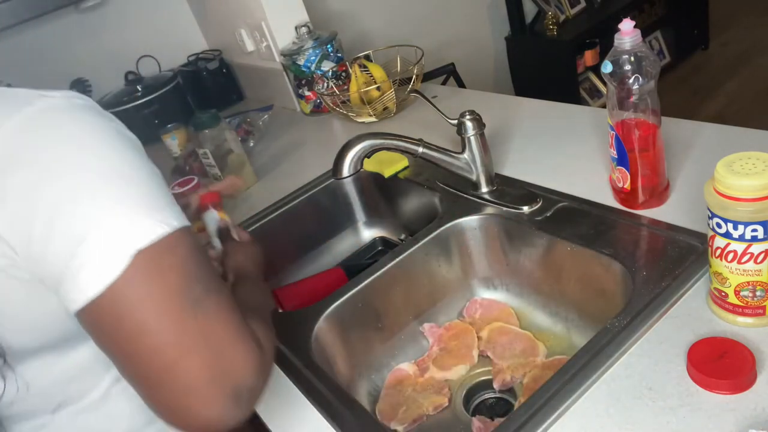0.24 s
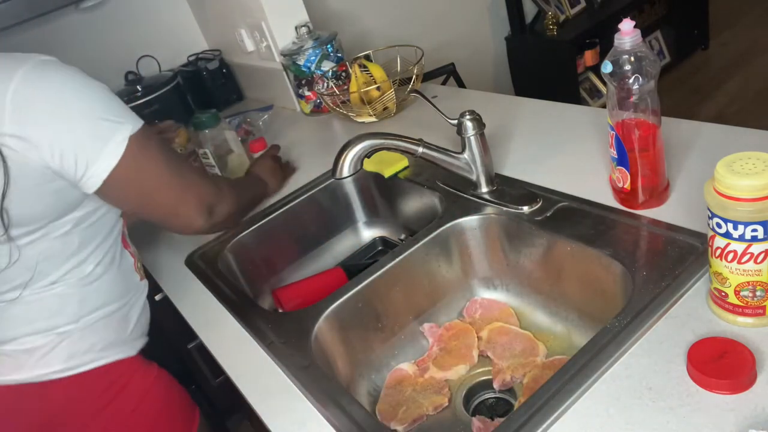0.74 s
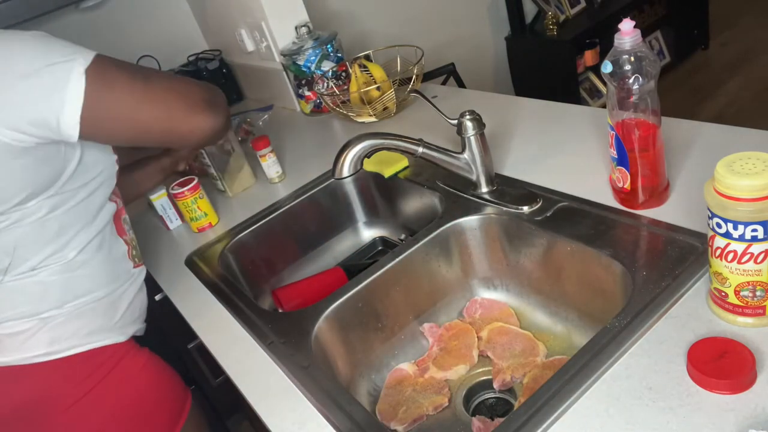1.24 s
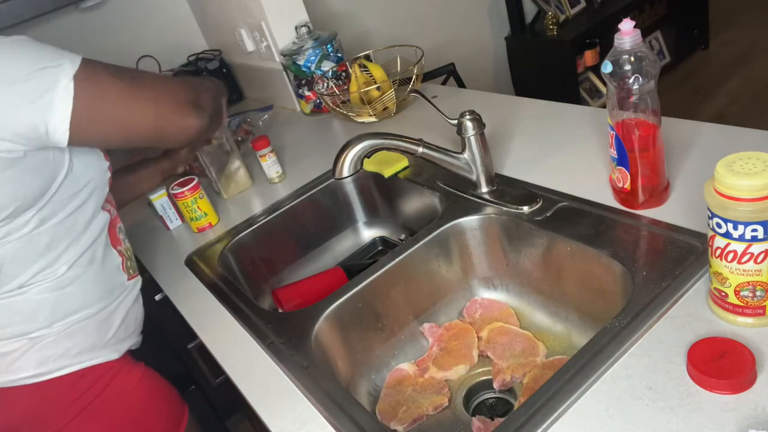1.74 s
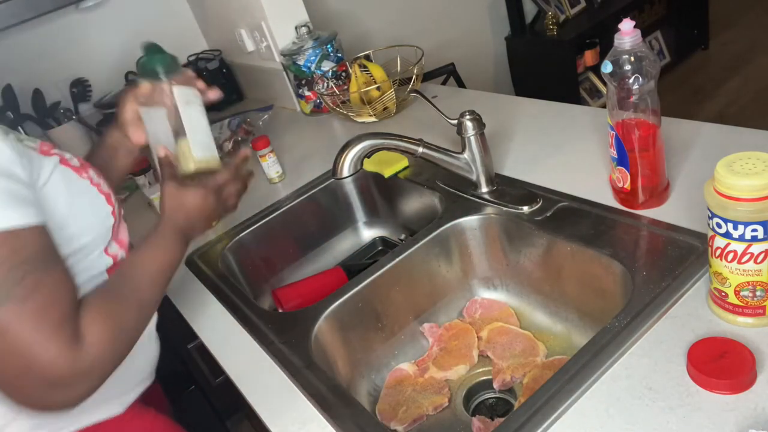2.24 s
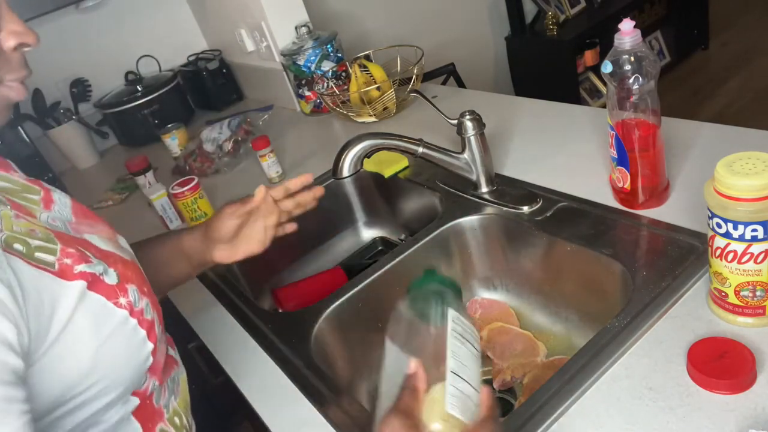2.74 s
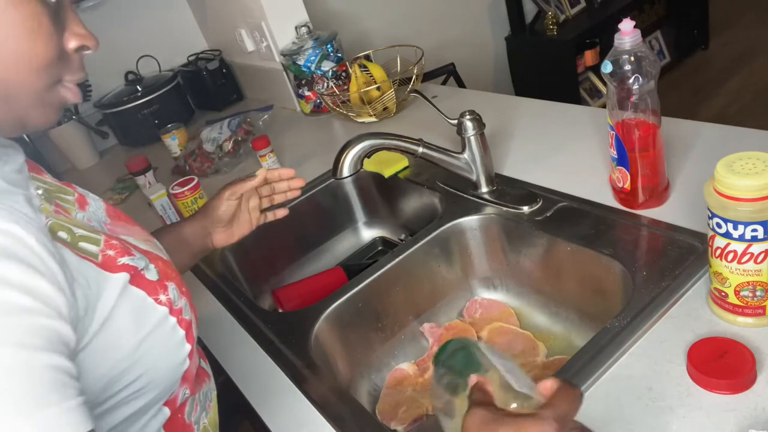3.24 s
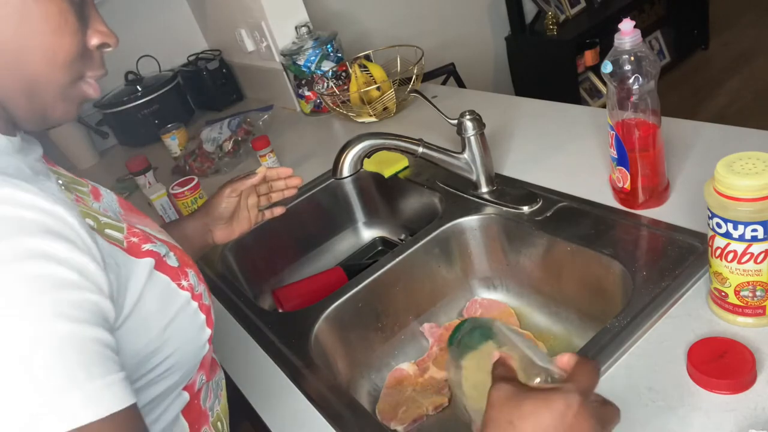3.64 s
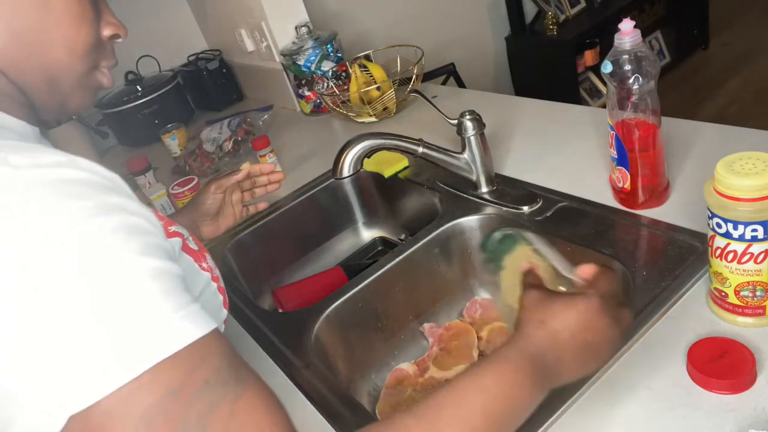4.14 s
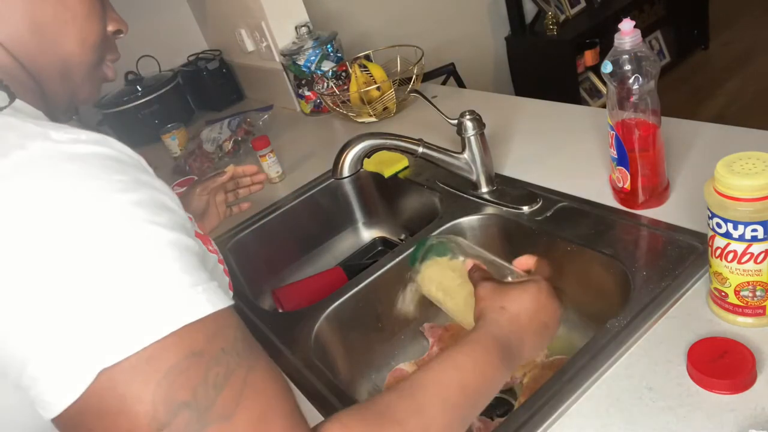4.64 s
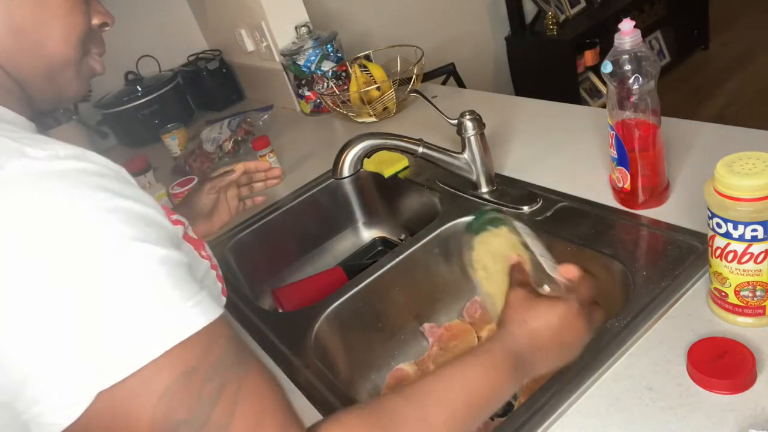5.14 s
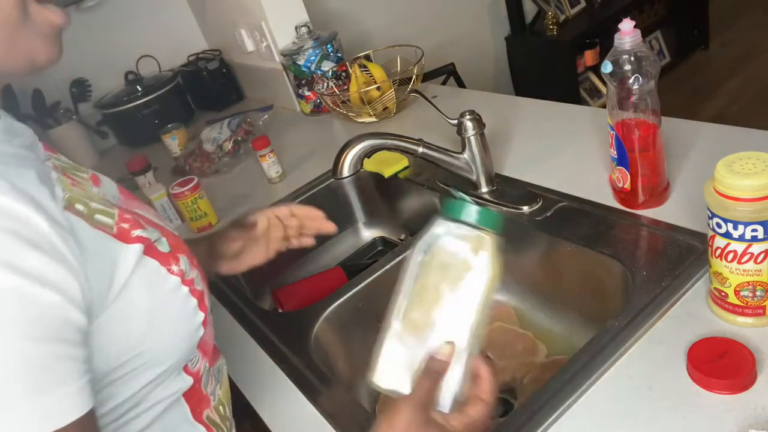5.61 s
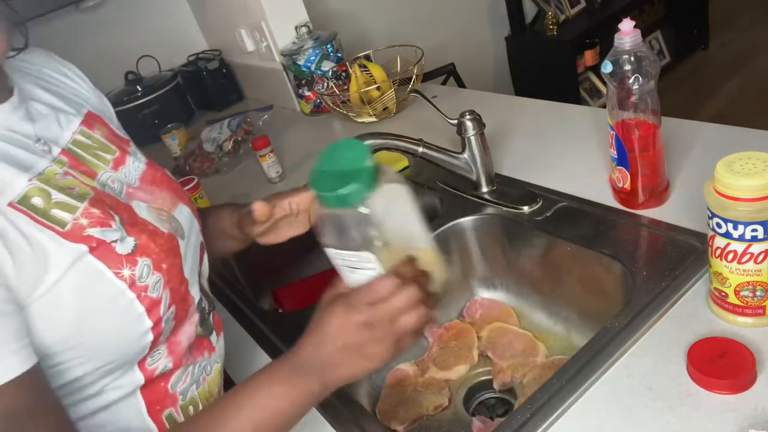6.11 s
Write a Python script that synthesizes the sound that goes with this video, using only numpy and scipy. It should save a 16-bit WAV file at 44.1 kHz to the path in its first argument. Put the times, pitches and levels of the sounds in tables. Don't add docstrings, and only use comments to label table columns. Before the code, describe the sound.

Hollow jar knocks and a sharp counter bang, then quick dry granule shakes, a ringing lid snap and a final thump in a hard kitchen.

```python
import sys
import numpy as np
from scipy import signal
from scipy.fft import rfft, irfft, next_fast_len
from scipy.io import wavfile
from scipy.ndimage import uniform_filter1d

SR = 44100
rng = np.random.default_rng(int(sys.argv[2]) if len(sys.argv) > 2 else 0)


def file_out(sig):
    cols = np.atleast_2d(sig).T
    lim = np.clip(cols, -1, 1)
    pcm = np.round(lim * 32767).astype(np.int16)
    wavfile.write(sys.argv[1], SR, pcm)


def ratio(d):
    e = np.asarray(d, float) / 20
    return 10 ** e


N = 280917
LEAD = 8192


def at_hz(points, hz, column=1):
    points = np.array(points)
    return np.interp(np.log(hz), np.log(points[:, 0]), points[:, column])


def drift(rate):
    r = np.exp(-80 * np.pi * rate / SR)
    noise = rng.standard_normal(N // 40 + 4002)
    slow = signal.lfilter([1], [1, -2 * r, r * r], noise)[4000:]
    slow = slow - slow.mean()
    slow = slow / np.sqrt(np.mean(slow ** 2) + 1e-30)
    return np.interp(np.arange(N) / 40, np.arange(len(slow)), slow)


# (pitch_hz, likeness)
SIDE_LIKENESS = [(60, 0.9), (130, 0.8), (290, -0.1), (640, -0.3), (1400, -0.2), (3100, 0.0064),
                 (6000, -0.027), (12500, 0.1)]
# (pitch_hz, left_over_right_db)
LEFT_LEAN = [(60, 9), (240, 5.5), (950, 2), (3770, 3), (15000, -2)]


def coloured(pair, spectrum):
    length = pair.shape[1]
    size = next_fast_len(length)
    hz = np.maximum(np.arange(size // 2 + 1) * SR / size, 1)
    alike = np.clip(at_hz(SIDE_LIKENESS, hz), -.98, .98)
    lean = ratio(at_hz(LEFT_LEAN, hz) / 2)
    shares = np.sqrt([1 + alike, 1 - alike])
    mid, side = rfft(pair, size) * ratio(at_hz(spectrum, hz)) * shares
    out = irfft([(mid + side) * lean, (mid - side) / lean], size)[:, :length]
    return out / np.std(out.mean(0))


def struck(spectrum, size=4096):
    hz = np.maximum(np.arange(size // 2 + 1) * SR / size, 1)
    cepstrum = irfft(np.log(ratio(at_hz(spectrum, hz))))
    cepstrum[1:size // 2] *= 2
    answer = irfft(np.exp(rfft(cepstrum[:size // 2], size)))
    return answer / np.abs(answer).max()


BLOW_TIMES = [-0.06, 0.0657, 0.6385, 1.035, 1.2085, 1.4045, 1.5257, 5.5423, 6.362]
# (level_db, left_over_right_db, bounce_db, lead_in_db, room_send_db)
BLOWS = [
    (-10.5, 10.5, 9, -24, -15.5),
    (-11.5, 20, -24, -35.5, -15.5),
    (-19, 4, -12, -38, -13),
    (-53.5, -2, -14, -28, -12),
    (-47, 6, -5, -37, -19.5),
    (-19, 1.5, -8, -33, -14.5),
    (-3.5, 9.5, -7, -31.5, -13),
    (-4, 5.5, -13, -36, -17),
    (-13, 6.5, 1.5, -39, -6),
]
# (extra_level_db, push, + or - for direction)
BLOW_CLICKS = [(0, 1), (-3, 0.91), (2, 0.93), (0, 1), (0, 1), (3.5, 0.95), (-5.5, -1), (5, 1), (-0.5, 1)]
# (pitch_hz, level_db per Hz)
SMALL_JAR_COLOURS = [
    [(120, -36.5), (200, -18), (390, -5), (721, -12.5), (896, -4.5), (1660, -8), (2850, -17), (4640, -15),
     (9550, -21), (12500, -28), (15000, -88)],
    [(120, -40), (200, -19), (282, -12), (789, -8), (2380, -8), (3230, -12.5), (4550, -4), (5760, -13),
     (10800, -6.5), (13200, -12), (15000, -44.5)],
    [(88, -42), (150, -14.5), (371, -12), (486, -13.5), (649, -10.5), (1250, -18), (1350, -14),
     (1640, -18.5), (3890, -26.5), (4250, -33), (4750, -25), (5400, -30), (11700, -33), (14000, -38),
     (15500, -70)],
]
# (pitch_hz, level_db per Hz)
NUDGE_COLOURS = [
    [(240, -24.5), (400, 6), (1130, -13), (1360, -1), (1660, -31.5), (2270, -22.5), (12000, -43.5),
     (15600, -73), (22000, -120)],
    [(350, -44.5), (600, -15), (1000, -2), (2200, -14), (2830, -25.5), (3460, -50), (6000, -29),
     (7800, -71.5), (13200, -120)],
    [(240, -38.5), (400, -11.5), (907, -7), (994, -9.5), (1800, -10), (2600, -8), (4300, -19), (6500, -14),
     (9810, -15.5), (12900, -17), (16000, -40)],
]
# (pitch_hz, level_db per Hz)
HARD_COLOURS = [
    [(180, -30), (300, -9), (326, -20.5), (462, -11), (1060, -8.5), (1460, -3), (9090, -11), (12500, -18),
     (16000, -86)],
    [(250, -31), (900, -22), (1200, -5), (1550, -9), (1900, -12), (2200, -5), (2430, 0), (2750, -10.5),
     (3400, -20.5), (4700, -21), (5200, -14), (5700, -29), (6400, -23), (8000, -29.5), (9000, -41.5),
     (15000, -49)],
    [(180, -43.5), (300, -12), (678, -3), (2170, -19), (2740, -25), (9390, -9.5), (12700, -16.5),
     (14500, -24.5), (16000, -72)],
]


def knocks():
    common_click_db, click_top_hz = -11, 14300
    first_echo_db = -15
    before = 900
    direct, send = np.zeros((2, N + LEAD + SR)), np.zeros(N + LEAD + SR)
    t = np.arange(-before, 600) / SR
    soften = signal.butter(4, click_top_hz, fs=SR, output="sos")
    colours = SMALL_JAR_COLOURS + NUDGE_COLOURS + HARD_COLOURS
    for start_s, row, (click_db, push), colour in zip(BLOW_TIMES, BLOWS, BLOW_CLICKS, colours):
        level_db, pan_db, bounce_db, lead_in_db, send_db = row
        body = struck(colour) * ratio(level_db)
        start = LEAD + round(start_s * SR)
        send[start:][:len(body)] += body * ratio(send_db)
        body[:2] += ratio(level_db + common_click_db + click_db) * np.array([1, -.75])
        body = signal.sosfilt(soften, body)
        lead_in = signal.lfilter([1], [1, -.55], rng.standard_normal(len(t)))
        contact = lead_in * ratio(lead_in_db - 20 * np.abs(t) / 0.01)
        contact[[before, before + 30, before + 230]] += 1, -ratio(first_echo_db), ratio(bounce_db)
        sound = push * np.convolve(contact, body)
        for side, lag in enumerate((2, 0)):
            first = start - before + lag
            direct[side, first:][:len(sound)] += sound * ratio(pan_db * (.5 - side))
    return direct[:, :N + LEAD], send[:N + LEAD]


# (start_s, level_db,
# pitch_hz, fade_60db_s)
THUD_TONES = [ (0.0660, -23.5, 776, 0.037), (0.0658, -24, 10500, .02), (0.068, -32, 9500, .02),
              (0.071, -36.5, 151, 0.16), (0.6417, -36.5, 395.5, 0.34), (0.6460, -29, 647, 0.1),
              (0.643, -36.5, 1005, 0.15), (0.65, -31.5, 131, 0.057), (0.7001, -42, 598, 0.29),
              (0.6385, -36, 2500, .03), (0.716, -38, 480, .1), (1.0355, -33, 101, 0.19),
              (1.0402, -38, 182, 0.18), (1.2621, -63, 951, 0.047), (1.3051, -60, 990, 0.072),
              (1.4039, -24.5, 901, 0.018), (1.5253, -10, 2450, 0.02), (1.5256, -25.5, 4140, 0.044),
              (1.5266, -17.5, 950, .041), (1.5312, -22, 1150, .04), (1.5258, -25, 8900, .012),
              (1.5258, -22.5, 202, 0.085), (1.532, -26, 456, 0.11), (1.5400, -32, 237, 0.27),
              (1.549, -15, 68.5, 0.062), (1.6403, -31.5, 67, 0.097), (2.4193, -42.5, 165, 0.11),
              (2.5604, -67, 1830, 0.089), (2.8021, -55.5, 1495, 0.1), (5.5421, -16.5, 1170, 0.038),
              (5.5375, -23, 2410, .03), (5.5421, -19.5, 2420, 0.036), (5.5422, -28.5, 4780, .016),
              (5.812, -33.5, 138, 0.11), (6.3621, -21, 181, 0.057), (6.3631, -27, 301, 0.12)]


def thuds():
    out, t = np.zeros((2, N + SR)), np.arange(SR // 2) / SR
    phase = np.array([[.45], [-.45]])
    for start_s, level_db, pitch_hz, fade_s in THUD_TONES:
        swell = ratio(level_db - 60 * t / fade_s) * (1 - np.exp(-t * pitch_hz * 2.7))
        out[:, round(start_s * SR):][:, :len(t)] += swell * np.sin(2 * np.pi * pitch_hz * t + phase)
    return out[:, :N] * ratio([[1.8], [-1.8]])


# (pitch_hz, level_db, fade_60db_s)
SINK_TONES = [(1176, -40, .4), (1320, -39, .45), (1550, -38, .45), (1716, -36, .35), (1973, -37, .45),
              (2180, -36.5, .45), (2240, -35.5, 0.31), (2320, -33.5, .6), (2381, -30.5, .5),
              (2425, -31, .45), (2475, -33, .45), (2540, -36, .45), (2920, -38.5, .45), (4990, -47, .35),
              (5200, -42, .4)]


def sink():
    start = round(5.5425 * SR)
    out, t = np.zeros((2, N)), np.arange(N - start) / SR
    for pitch_hz, level_db, fade_s in SINK_TONES:
        level = ratio(level_db - 60 * t / fade_s + 3.0 * drift(14)[start:]) * np.minimum(t / .004, 1)
        phase = .8 * drift(14)[start:] + rng.uniform(0, 6, (2, 1))
        out[:, start:] += level * np.sin(2 * np.pi * pitch_hz * t + phase)
    return out * ratio([[.3], [-.3]])


# (peak_s, patter_db, slide_db, rub_db)
JAR_FLICKS = [(2.865, -67, -59.5, -63), (2.93, -73.5, -66.5, -69), (3.045, -62, -65, -64),
              (3.16, -76, -74, -69.5), (3.245, -60.5, -66.5, -63), (3.445, -60.5, -68.5, -68),
              (3.53, -66.5, -79, -72.5), (3.61, -58, -66.5, -69), (3.745, -61, -89, -87),
              (3.82, -57, -71, -71), (4.01, -60.5, -72, -74.5), (4.09, -60.5, -81, -76),
              (4.203, -56, -65.5, -67.5), (4.31, -64.5, -72, -76.5), (4.398, -58.5, -64, -71),
              (4.48, -66, -73, -73), (4.585, -58.5, -66, -72), (4.755, -59.5, -70, -72.5),
              (4.865, -60.5, -66, -71.5), (4.95, -61, -69.5, -69), (5.035, -60.5, -78, -75.5),
              (5.21, -62, -83, -87), (5.265, -58.5, -69, -73.5), (5.36, -65.5, -88, -90),
              (5.445, -64, -87, -83.5), (5.75, -53, -56.5, -55.5), (5.905, -59.5, -62, -59),
              (5.965, -60.5, -62, -62.5)]
# (peak_s, patter_db, slide_db, rub_db)
JAR_HANDLING = [(0.404, -68, -85, -85), (0.476, -76, -59, -78), (0.505, -78, -61, -85.5),
                (0.54, -70, -69.5, -76), (1.0, -80.5, -88.5, -87.5), (1.036, -79, -72.5, -70),
                (1.115, -77, -83.5, -75), (1.15, -80, -86.5, -75), (1.21, -83.5, -82.5, -70),
                (1.272, -98, -85.5, -66.5), (1.315, -100, -87, -71.5), (1.35, -92.5, -87, -73.5),
                (2.07, -72, -77.5, -91.5), (2.12, -69.5, -73.5, -82), (2.17, -73.5, -74.5, -81),
                (2.32, -75, -77.5, -76.5), (2.435, -74.5, -71, -71.5), (2.5, -77, -76, -73.5),
                (2.56, -75, -72, -75.5), (2.595, -75.5, -73.5, -86), (2.803, -91, -69, -70.5),
                (2.825, -74, -62, -64), (6.212, -75.5, -96, -96), (6.26, -77.5, -89.5, -92),
                (6.33, -78, -82, -79.5)]
# (time_s, patter_db)
JAR_TRICKLE = [(2.79, -100), (2.85, -69), (3.2, -70.5), (3.6, -66.5), (4.5, -67), (5.12, -70), (5.5, -71.5),
               (5.6, -55), (5.8, -69), (6.0, -69), (6.15, -100)]


def effort(column):
    t = np.arange(0, N + 32, 32) / SR
    under_patter_db = (0, -13, -13.5)[column]
    power = ratio(np.interp(t, *np.transpose(JAR_TRICKLE)) + under_patter_db) ** 2
    # table, hold on either side of the peak (s), then rise and fall of the layer (dB per s)
    movements = [(JAR_FLICKS, 0.0072, (241.5, 400.5, 298), (230.5, 258.5, 199)),
                 (JAR_HANDLING, 0, (550.5, 901.5, 599.5), (140, 172.5, 109.5))]
    for table, hold_s, rise_db, fall_db in movements:
        rows = np.array(table)
        since = t - rows[:, :1]
        slope_db = np.where(since < 0, rise_db[column], -fall_db[column])
        past_hold = since * np.clip(1 - hold_s / (np.abs(since) + 1e-9), 0, 1)
        levels = ratio(rows[:, [column + 1]] + slope_db * past_hold)
        power = power + np.sum(levels ** 2, axis=0)
    return np.interp(np.arange(N) / SR, t, np.sqrt(power))


def grains(per_s, uneven_db):
    sizes = ratio(uneven_db * np.minimum(rng.exponential(1, (2, N)), 5))
    signs = rng.choice([-1, 1], (2, N))
    return sizes * signs * (rng.random((2, N)) < per_s / SR)


def played(gain, source, spectrum):
    return coloured(source * gain, spectrum) * np.sqrt(np.mean(gain ** 2))


# (pitch_hz, level_db per Hz)
PATTER_COLOUR = [(1500, -42.5), (2500, -12.5), (3500, -8.5), (5900, -4), (7600, 0), (10800, 0.5),
                 (13200, -6), (14400, -9), (16200, -46)]
# (pitch_hz, level_db per Hz)
SLIDE_COLOUR = [(700, -35), (1200, 0), (1520, -2), (1900, -2.5), (2700, -1.5), (3600, -6), (5000, -12),
                (7000, -19), (12000, -59.5)]
# (pitch_hz, level_db per Hz)
RUB_COLOUR = [(300, -12.5), (550, -1), (850, -0.5), (1200, -3), (1450, -7.5), (1900, -15.5), (4000, -61.5)]


def granules():
    hits = grains(per_s=4400, uneven_db=-1.0) * ratio(1.6 * drift(70) + 1.0 * drift(20))
    slips = grains(per_s=4200, uneven_db=-1.5) * ratio(1.1 * drift(12))
    scrapes = grains(per_s=3900, uneven_db=3.5)
    patter = played(effort(column=0), hits, PATTER_COLOUR)
    slide = played(effort(column=1), slips, SLIDE_COLOUR)
    rub = played(effort(column=2), scrapes, RUB_COLOUR)
    return patter + slide + rub


# (start_s, level_db, pitch_hz)
CAP_TICKS = [(0.9975, -52, 5050), (1.0315, -50, 3610), (1.1065, -51, 5280), (1.1575, -51, 6200),
             (1.398, -34, 2490), (1.0355, -39, 1000), (1.2085, -49, 1105), (1.222, -46, 1092),
             (1.2655, -47, 1297), (1.273, -42, 900), (1.283, -42, 1003), (1.3, -47, 1496),
             (1.3155, -39, 1096), (1.345, -49, 1200), (3.5783, -32, 8500), (4.0637, -50, 10050),
             (4.0785, -40, 9050), (4.0786, -36, 14500), (1.4046, -32, 14500), (4.0787, -49, 5000),
             (4.0965, -45, 9000), (4.327, -42, 8500), (4.7336, -45, 9600), (4.7543, -44, 9000),
             (5.0232, -44, 9000), (5.3569, -43.5, 9500), (5.4422, -46, 9510), (2.804, -43, 1300),
             (2.8097, -53, 8000), (6.2118, -48, 9530)]


def ticks():
    out, t = np.zeros(N), np.arange(SR // 50) / SR
    for start_s, level_db, pitch_hz in CAP_TICKS:
        snap = ratio(level_db - 60 * t / 0.014) * rng.standard_normal(len(t)) * .5
        band = signal.butter(2, [pitch_hz, pitch_hz * 1.5], "band", fs=SR, output="sos")
        out[round(start_s * SR):][:len(t)] += signal.sosfilt(band, snap)
    return out


# (pitch_hz, fade_60db_s, level_db)
ROOM_FADE = [(99.75, 0.94, -4), (300, 0.58, 5.5), (835, 0.72, -2.5), (2200, 0.62, -2.5), (4700, 0.69, -6.5),
             (8300, 0.48, -2), (12900, 0.31, 1.5)]


def room_echo():
    t, hz = np.arange(SR) / SR, np.arange(SR // 2 + 1) + 1.
    white = rfft(coloured(rng.standard_normal((2, SR)), [(20, 0), (20000, 0)]))
    out = 0
    for centre in np.geomspace(60, 16000, 17):
        distance = np.abs(np.log(hz / centre)) / np.log(16000 / 60) * 16
        share = np.clip(1 - distance, 0, 1)
        fading = ratio(at_hz(ROOM_FADE, centre, column=2) - 60 * t / at_hz(ROOM_FADE, centre))
        out = out + irfft(white * share, SR) * fading
    return out * np.minimum(t / 0.0019, 1) * ratio(-11.5)


# (pitch_hz, level_db, wobble_db)
MOTOR_TONES = [(59, -49.5, 0.2), (118.7, -59, -1.5), (178, -71, -0.5), (251.3, -69.5, 1), (360, -77.5, 2.5),
               (7840, -89.5, -4)]
# (pitch_hz, level_db per Hz)
RUMBLE_COLOUR = [(15, -35), (25, -9.5), (48, -6), (69, -2.5), (135, -11), (167, -20), (271, -11),
                 (604, -29.5), (1210, -38), (1390, -47), (3830, -53.5), (7280, -52.5), (8100, -51),
                 (12400, -55), (15000, -78)]


def refrigerator():
    t, tones = np.arange(N) / SR, 0
    for pitch_hz, level_db, wobble_db in MOTOR_TONES:
        level = ratio(level_db + 3.5 + wobble_db * drift(0.35))
        phase = .15 * drift(4.9) + rng.uniform(0, 6)
        tones = tones + level * np.sin(2 * np.pi * pitch_hz * t + phase)
    high_pass = signal.butter(4, 52, "high", fs=SR, output="sos")
    rumble = signal.sosfilt(high_pass, coloured(rng.standard_normal((2, N)), RUMBLE_COLOUR))
    return tones * ratio([[1.9], [-1.9]]) + ratio(-55.0) * rumble


def scene():
    direct, send = knocks()
    shaken = granules() + ticks()
    send[LEAD:] += ratio(-32.5) * shaken[0]
    wet = signal.fftconvolve(send[None], room_echo(), axes=1)[:, LEAD:N + LEAD]
    return direct[:, LEAD:] + wet + shaken + thuds() + sink() + refrigerator()


def thinned(x):
    hz, _, frames = signal.stft(x, SR, nperseg=2048, noverlap=1024)
    power = np.mean(np.abs(frames[:1024].reshape(128, 8, -1)) ** 2, axis=1)
    power = np.repeat(power, 8, axis=0)
    hz = hz[:-1, None]
    treble = power[(hz[:, 0] > 7000) & (hz[:, 0] < 12000)].mean(axis=0)
    steady = signal.medfilt(treble, 9)
    luck = uniform_filter1d(rng.standard_normal((128, len(treble))), size=2)
    luck_db = 2.5 * np.repeat(luck, 8, axis=0)
    weak = (hz > 1250) & (hz < 5000) & (power < steady * ratio(2 * -14.5 + 2 * luck_db))
    thin = (hz > 13000) & (power < treble * ratio(2 * -8))
    frames[:-1] *= 1 - (weak | thin)
    return signal.istft(frames, SR, nperseg=2048, noverlap=1024)[1][:N]


def roll_off(x):
    return signal.sosfilt(signal.butter(12, 16460, fs=SR, output="sos"), x)


def record(dry):
    left, right = 1.3 * np.tanh(dry / 1.3)
    side_gap = signal.cheby2(6, 30, [6900, 10300], "bandstop", fs=SR, output="sos")
    side = signal.sosfiltfilt(side_gap, (left - right) / 2)
    mid = (left + right) / 2
    low_pass = signal.cheby2(10, 24, 14000, fs=SR, output="sos")
    top = mid - signal.sosfiltfilt(low_pass, mid)
    loud = uniform_filter1d(top ** 2, size=200) > ratio(-53.5) ** 2
    gate = np.clip(3 * uniform_filter1d(loud * 1., size=300), 0, 1)
    centre = (1 - gate) * thinned(mid - top) + gate * mid
    return roll_off(centre + side * np.array([[1], [-1]]))


dry = scene()
out = record(dry)
file_out(out)
```